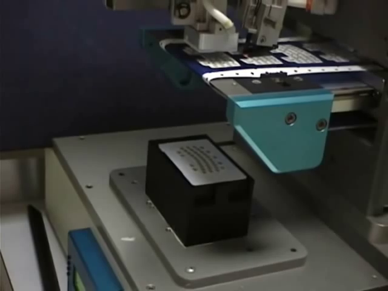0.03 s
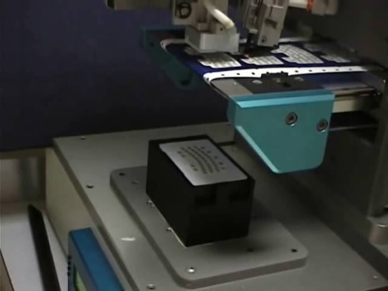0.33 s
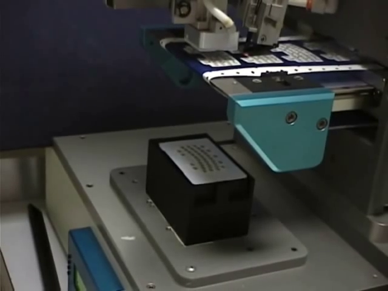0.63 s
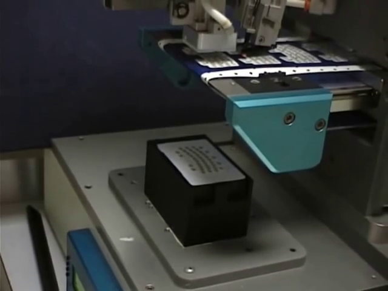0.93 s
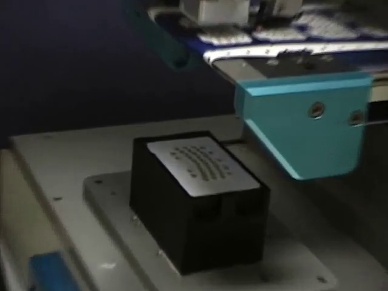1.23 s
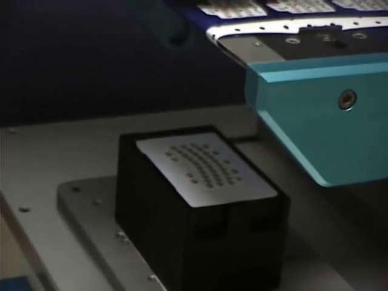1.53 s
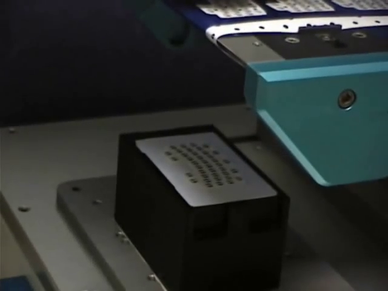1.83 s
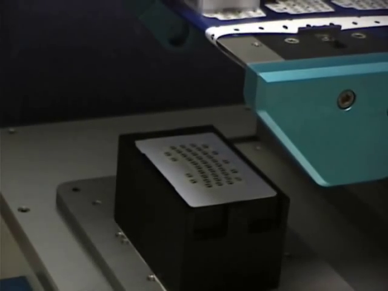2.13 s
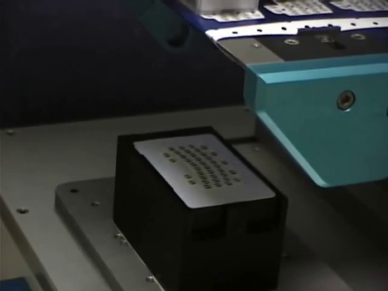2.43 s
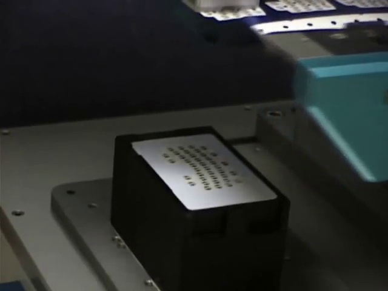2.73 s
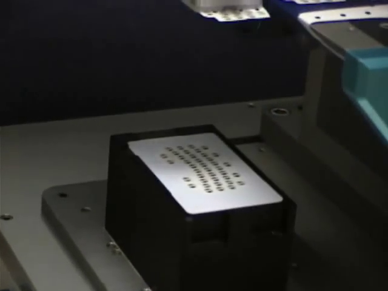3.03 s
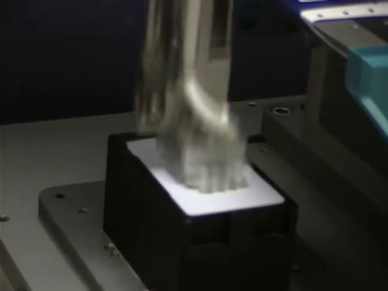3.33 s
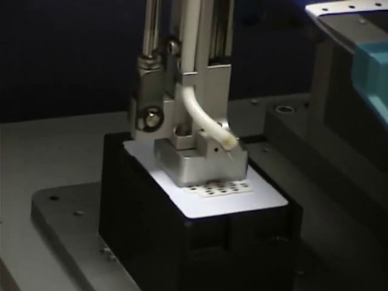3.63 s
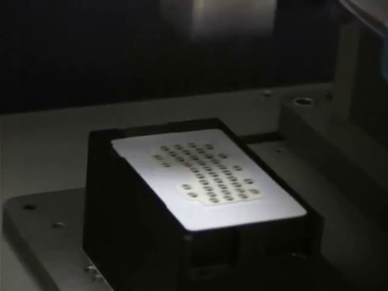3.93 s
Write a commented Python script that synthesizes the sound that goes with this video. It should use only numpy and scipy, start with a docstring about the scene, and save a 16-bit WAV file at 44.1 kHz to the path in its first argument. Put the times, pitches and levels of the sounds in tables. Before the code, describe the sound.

An assembly machine hums softly, then a valve snaps and air hisses loudly over knocks.

```python
"""Inside a pick-and-place machine

In a steel cabinet a fan hums, air leaks faintly and small parts tick and scrape. A valve snaps open
and a vacuum ejector hisses loudly from then on, while the pneumatic head knocks, shudders and travels.
The nearest wall throws the sound back a few milliseconds later."""
import sys
import numpy as np
from scipy import signal
from scipy.fft import rfft, irfft
from scipy.io import wavfile
from scipy.ndimage import uniform_filter1d

SR = 44100
rng = np.random.default_rng(int(sys.argv[2]) if len(sys.argv) > 2 else 0)


def unload_wav(signal):
    """Save mono or channel-first audio to the path in sys.argv[1] as 16-bit WAV at rate SR, clipped to [-1, 1]."""
    wavfile.write(
        sys.argv[1],
        SR,
        np.round(np.clip(np.atleast_2d(signal).T, -1, 1) * 32767).astype(np.int16),
    )


N = 176400
TIME = np.arange(N) / SR
FREQS = np.arange(N // 2 + 1) * SR / N


def undb(db):
    """Decibels to gain."""
    return 10 ** (np.asarray(db) / 20)


def unit(x):
    """Scale to rms 1."""
    return x / np.sqrt(np.mean(x ** 2))


def pan(db):
    """Stereo gains that put the left db above the right."""
    return undb(db * np.array([[.5], [-.5]]))


def contour(points):
    """A dB curve over the spectrum, joining (Hz, dB) points on a log-frequency axis."""
    hz, db = np.array(points, float).T
    return np.interp(np.log(FREQS + 1), np.log(hz), db)


def noise(gain):
    """Noise of rms 1, coloured by a gain per frequency bin."""
    return unit(irfft(rfft(rng.standard_normal(N)) * gain, N))


def walk(rate):
    """A smooth random drift that takes rate steps a second."""
    hold = max(int(SR / rate), 2)
    steps = rng.standard_normal(N)[np.arange(N) // hold]
    return 0.96 * uniform_filter1d(uniform_filter1d(steps, hold), hold)


def burst(t, db, decay_s, top_hz):
    """Dying noise, dull above top_hz."""
    raw = rng.standard_normal(len(t)) * np.exp(-t / decay_s) * np.sqrt(SR / 2 / top_hz)
    return undb(db) * signal.sosfilt(signal.butter(4, top_hz, fs=SR, output="sos"), raw)


def wall(x, delay_s=.00682, gain=0.36, dull_hz=2680):
    """Add the dull, inverted echo of the nearest wall."""
    echo = gain * np.exp(-2j * np.pi * FREQS * delay_s) / (1 + (FREQS / dull_hz) ** 2)
    response = irfft(1 - echo, N)[None, :N // 20]
    return signal.fftconvolve(np.atleast_2d(x), response, axes=1)[:, :N]


def cabinet(x, room_db, t60_s=0.33):
    """Add the wall echo and the cabinet's short diffuse ring, different left and right."""
    t = TIME[:N // 8]
    tail = rng.standard_normal((2, len(t))) * undb(-60 * t / t60_s) * (t > .002)
    tail /= np.sqrt(np.sum(tail ** 2, axis=1, keepdims=True))
    return wall(x) + undb(room_db) * signal.fftconvolve(np.atleast_2d(x), tail, axes=1)[:, :N]


def strike(blows, modes, crack, rattle, room_db):
    """Blows ring a part's modes, with a crack and a duller rattle, each given as (dB, decay s, top Hz)."""
    t = TIME[:N // 4]
    ring = sum(undb(db - 60 * t / t60) * np.sin(2 * np.pi * hz * t) for hz, db, t60 in modes)
    hits = np.zeros(2 * N)
    for start_s, db in blows:
        at = int(start_s * SR)
        hits[at:at + len(t)] += undb(db) * (ring + burst(t, *crack) + burst(t, *rattle))
    bass_cut = signal.butter(4, 143, "high", fs=SR, output="sos")  # small parts radiate no deep bass
    return cabinet(signal.sosfilt(bass_cut, hits[:N]), room_db)


def fan(level_db=-49.5, spread=0.59):
    """The fan's low, wide rush of air, coloured by the wall."""
    # Each row: frequency in Hz, relative level in dB.
    spectrum = [(20, -17), (60, -16), (95, -13.5), (125, -12.5), (200, -0.5), (370, -3.5), (600, -8.5),
                (850, -10.5), (1200, -13), (2000, -15), (2800, -15), (4000, -44)]
    mid, side = (unit(wall(noise(undb(contour(spectrum))))) for _ in range(2))
    return undb(level_db) * pan(-0.5) * (mid + spread * side * np.array([[1], [-1]]))


def air_leak(level_db=-46):
    """Leaking air: a faint, diffuse hiss that wavers slightly."""
    # Each row: frequency in Hz, relative level in dB.
    spectrum = [(1500, -20), (3000, -0.5), (4400, 4), (5700, 0), (7300, 3.5), (8200, -4.5), (9500, -4),
                (11500, -11.5), (15000, -24)]
    hiss = np.array([noise(undb(contour(spectrum))) for _ in range(2)])
    return hiss * undb(level_db + 0.53 * walk(3.7))


def wavering_tones(flicker_db=1.7):
    """Wavering low tones where the wall echo colours the fan's rush, a low hum and a thin high whine."""
    # Each row: pitch in Hz, level in dB, left over right in dB, phase waver in radians.
    tones = [(120, -64, 0, .4), (212, -62, 0, 1.6), (365, -61, -1, .9), (511, -68, 0, 1.6),
             (802, -68, -5, 1.5), (958, -70, -4, 1.2), (2638, -65, 0, 1.2), (4538, -71, 0, .6),
             (4606, -72, 0, .8), (5390, -65, -10, .2), (6289, -69, -2, .3), (7800, -71, 0, .15),
             (8360, -74, 0, .15), (8452, -73, 0, .15), (9006, -74, -2, .2)]
    drone = 0
    for hz, db, lean, waver in tones:
        gain = undb(db + flicker_db * walk(7.9)) * pan(lean)
        drone += gain * np.sqrt(2) * np.sin(2 * np.pi * hz * TIME + waver * walk(40))
    return drone


def scrapes():
    """Faint, thin scrapes: rough tones that hold their pitch or slide down."""
    # Each row: middle and half length in seconds, pitch in Hz, fall in octaves per second,
    # roughness as a fraction of the pitch, level in dB.
    strokes = [(.064, .008, 3700, 0, .28, -47), (1.77, .025, 3900, 4, .12, -54),
               (1.81, .02, 2950, 2, .05, -53)]
    scraping = 0
    for middle_s, half_s, hz, fall, rough, db in strokes:
        offset = np.clip(TIME - middle_s, -5 * half_s, 5 * half_s)
        pitch = hz * 2 ** (-fall * offset) * (1 + rough * walk(2500))
        swell = undb(db) * np.exp(-.5 * (offset / half_s) ** 2)
        scraping += swell * np.sin(2 * np.pi * np.cumsum(pitch) / SR)
    return cabinet(scraping, room_db=-3)


def cover_taps():
    """Soft taps ring a cover briefly."""
    # Each row: start in seconds, level in dB.
    taps = [(.374, -39.5), (.633, -49), (.639, -34.5), (.697, -43), (1.158, -43)]
    # The cover's modes. Each row: pitch in Hz, level in dB, seconds to fall 60 dB.
    modes = [(828, -0.5, 0.046), (950, -7.5, .04), (2240, -13, 0.023)]
    return strike(taps, modes, crack=(-19, .005, 3500), rattle=(-21, .015, 1200), room_db=-6)


def switch_clicks():
    """Sharp, relay-like clicks ring a small switch body."""
    # Each row: start in seconds, level in dB.
    clicks = [(1.5697, -26), (1.877, -42)]
    # The body's modes. Each row: pitch in Hz, level in dB, seconds to fall 60 dB.
    modes = [(795, -10, .05), (1800, -15, .012), (2767, -15, .025), (4250, 0, .012), (5300, 0, .012),
             (8900, -5, .005), (12600, -10, .005)]
    return strike(clicks, modes, crack=(-6, .0015, 9000), rattle=(-17, .007, 4000), room_db=-11)


def carriage():
    """The carriage rumbles in low swells as it speeds up or brakes."""
    # Each row: middle in seconds, half length in seconds, level in dB.
    moves = [(2.184, 0.024, -39), (2.437, 0.032, -37), (3.081, 0.028, -35.5), (3.287, .04, -40),
             (3.543, 0.043, -40.5)]
    # Each row: frequency in Hz, relative level in dB.
    rumble = [(50, -25), (115, -3), (175, 6), (270, -11), (520, -6), (900, -19), (3000, -45)]
    effort = sum(undb(db) * np.exp(-.5 * ((TIME - s) / half) ** 2) for s, half, db in moves)
    return cabinet(effort * noise(undb(contour(rumble))), room_db=-9.5)


def frame_shudder():
    """The head runs against its stop and the gantry frame shudders."""
    # Each row: start in seconds, level in dB.
    stops = [(2.277, -16), (2.2825, -16.5)]
    # The frame's modes. Each row: pitch in Hz, level in dB, seconds to fall 60 dB.
    modes = [(138, -5.5, 0.58), (203, -6, 0.097), (238, -13, 0.048), (364, -4, 0.14), (478, -5.5, 0.057)]
    return strike(stops, modes, crack=(-5.5, .005, 1000), rattle=(-6.5, .029, 423), room_db=-6.5)


def head_clacks():
    """Metal meets metal and rings the pick-up head."""
    # Each row: start in seconds, level in dB.
    clacks = [(2.3772, -13.5), (2.399, -22.5), (3.9835, -15)]
    # The head's modes. Each row: pitch in Hz, level in dB, seconds to fall 60 dB.
    modes = [(330, -17, 0.15), (550, -1, 0.023), (834, -6.5, 0.033), (1340, 6.5, 0.0075),
             (2940, 0.5, 0.0088)]
    return strike(clacks, modes, crack=(-3, .0016, 6000), rattle=(-11, .02, 1690), room_db=-4)


def valve_knocks():
    """The valve snaps over and knocks its block."""
    # Each row: start in seconds, level in dB.
    knocks = [(2.1132, -5), (3.2479, -8.5), (3.9762, -7.5), (3.9799, -12), (3.9836, -32)]
    # The block's modes. Each row: pitch in Hz, level in dB, seconds to fall 60 dB.
    modes = [(200, -25, .06), (415, -6, .012), (570, 1, .008), (540, -27, .14), (830, -22, .045)]
    return strike(knocks, modes, crack=(-12, .003, 7000), rattle=(-25, .04, 650), room_db=-7)


def jet_hiss(bass_db=-41.5):
    """The air jet rings its exhaust passages; three bands swell and sink above a steady bass."""
    # Each row: frequency in Hz, relative level in dB.
    spectrum = [(25, -23), (80, -26.5), (180, -24.5), (500, -22), (1000, -12), (1250, -17.5), (1450, -6.5),
                (2050, -4.5), (2300, 2.5), (2950, -0.5), (3350, 4), (3750, -4.5), (4450, -6), (4700, -1.5),
                (5600, -3.5), (6150, 2.5), (6550, -1.5), (7900, -0.5), (8100, -4.5), (8600, 0),
                (9450, -3.5), (9950, -11), (10500, -8), (11500, -13.5), (12100, -27), (12800, -22),
                (15000, -38)]
    # Narrow resonances. Each row: centre in Hz, width in Hz, lift in dB.
    passages = [(2233, 25, 4), (2323, 35, 5), (2476, 40, 5), (2624, 45, 5), (2775, 35, 4), (2931, 40, 5),
                (3276, 55, 4), (3365, 25, 5), (3526, 40, 4), (3844, 25, 6), (4840, 35, 5), (5434, 35, 4),
                (5648, 35, 5), (6128, 40, 4), (6242, 55, 4), (6706, 55, 4), (7350, 40, 3)]
    # Crossovers in Hz between bass, low middle, middle and treble.
    crossovers = [1300, 2050, 4100]
    # Each row: time in seconds, then treble, middle and low middle levels in dB.
    band_levels = [(2.15, -16.5, -23, -34.5), (2.316, -17, -23.5, -33), (2.34, -16.5, -20, -26),
                   (2.36, -19, -19, -32.5), (2.38, -15.5, -24.5, -27), (2.396, -18, -23, -31.5),
                   (2.486, -17.5, -19.5, -32.5), (2.78, -16.5, -21, -31), (2.794, -16, -19, -30),
                   (2.814, -18, -18.5, -35), (2.84, -18.5, -20.5, -29.5), (3.002, -17.5, -21, -26.5),
                   (3.222, -18, -21.5, -30.5), (3.258, -20.5, -28, -32), (3.268, -18.5, -22.5, -29.5),
                   (3.384, -17.5, -21, -27.5), (3.944, -17.5, -20.5, -31), (3.96, -17, -20, -30.5)]
    lift_db = sum(db / (1 + (2 * (FREQS - hz) / width) ** 2) for hz, width, db in passages)
    colour = undb(contour(spectrum) + lift_db)
    seconds, treble, middle, low = np.array(band_levels).T
    levels = [bass_db] + [np.interp(TIME, seconds, db) for db in (low, middle, treble)]
    band = np.searchsorted(crossovers, FREQS)
    return sum(noise(colour * (band == k)) * undb(db) for k, db in enumerate(levels))


def ejector(open_s=2.113, rise_s=0.022, first_flow=0.59, left_lag_s=.000025):
    """The jet builds once the valve opens; it beams unevenly, and the cabinet scatters the rest."""
    # Each row: frequency in Hz, left over right in dB.
    beam = [(1000, -1.5), (3500, 0.5), (5400, 0.5), (6200, -5), (6750, 5.5), (7500, 4), (8300, 0),
            (9600, 5.5), (10000, -0.5)]
    # Each row: frequency in Hz, scattered over direct sound in dB.
    scatter = [(200, -4), (900, -4), (2400, -15.5), (3300, -16), (4000, -2.5), (4800, -7), (8000, -8),
               (12000, -3)]
    direct, left, right = (jet_hiss() for _ in range(3))
    lag = np.exp(-2j * np.pi * FREQS * np.array([[.5], [-.5]]) * left_lag_s)
    beamed = rfft(direct) * pan(contour(beam)) * lag
    scattered = rfft(np.array([left, right])) * undb(contour(scatter))
    age = np.maximum(TIME - open_s, 0)
    flow = (TIME > open_s) * (1 - (1 - first_flow) * np.exp(-age / rise_s))
    flutter = undb(0.4 * walk(30.67))
    return cabinet(irfft(beamed + scattered, N) * flow * flutter, room_db=-14)


def scene():
    """Knocks, ticks and the air jet over an idling bed that swells slightly."""
    knocks = valve_knocks() + frame_shudder() + head_clacks()
    ticks = pan(-7) * (switch_clicks() + cover_taps())  # off to the right
    swell = undb(np.interp(TIME, [0, 1.3, 2.0], [-.5, 0, 1.3]))
    bed = (fan() + air_leak() + wavering_tones()) * swell
    return bed + ejector() + carriage() + scrapes() + knocks + ticks


def record(dry, top_hz=15100):
    """Clip at full scale and cut the highest treble steeply."""
    lowpass = signal.ellip(8, .2, 70, top_hz, fs=SR, output="sos")
    return signal.sosfilt(lowpass, np.clip(dry, -1, 1))


dry = scene()
out = record(dry)
unload_wav(out)
```